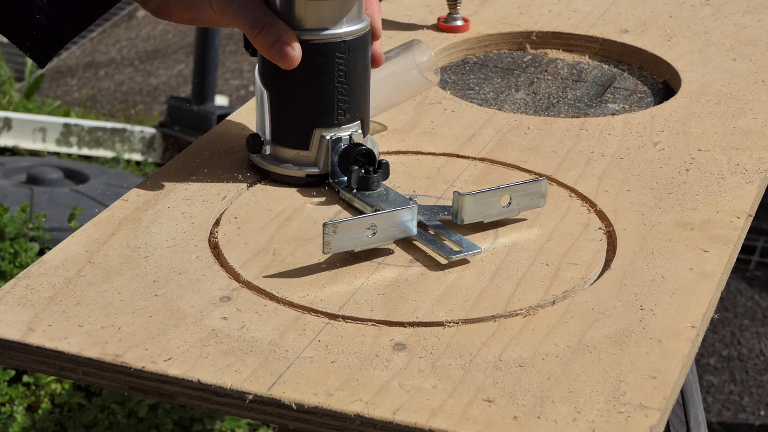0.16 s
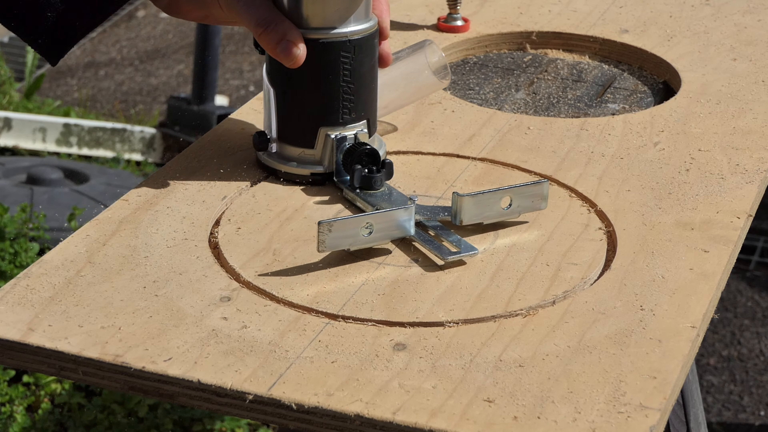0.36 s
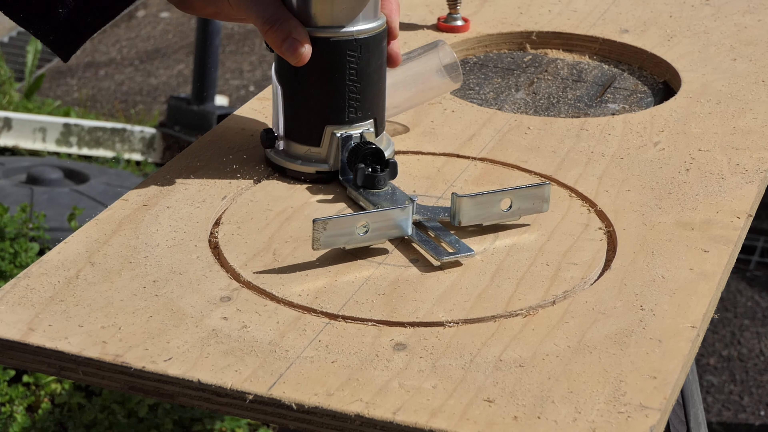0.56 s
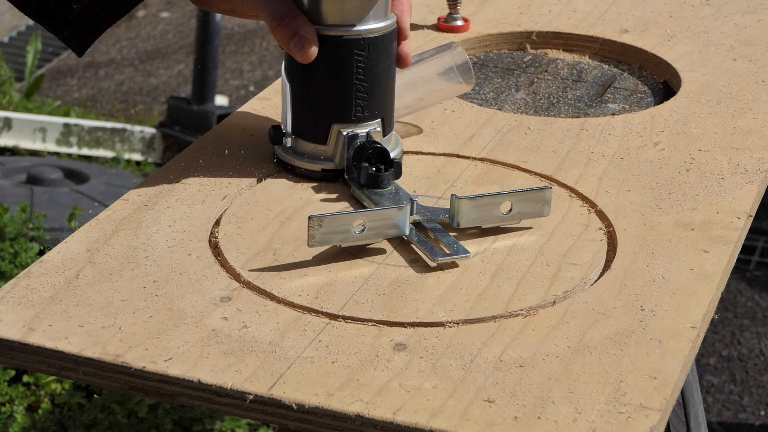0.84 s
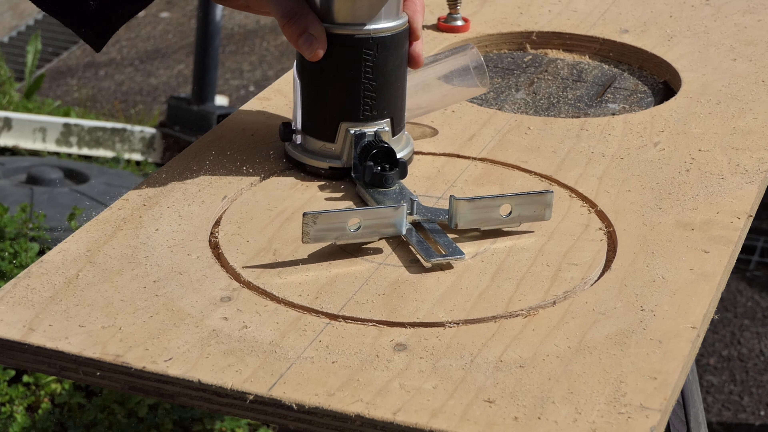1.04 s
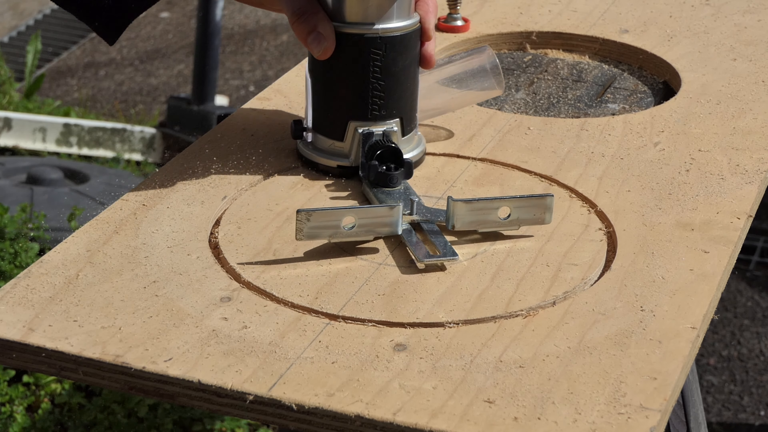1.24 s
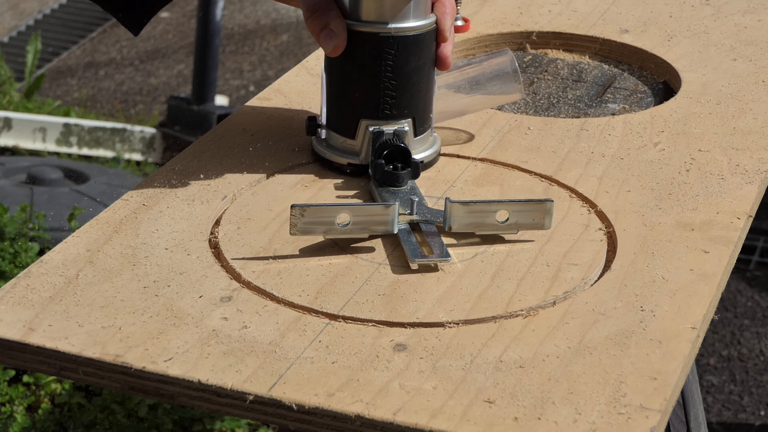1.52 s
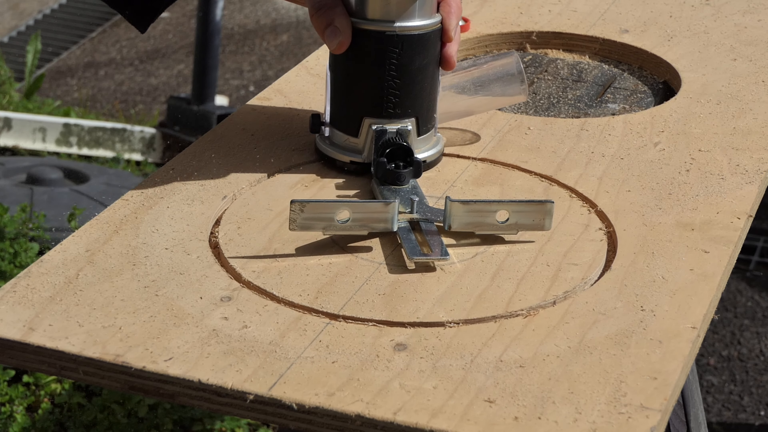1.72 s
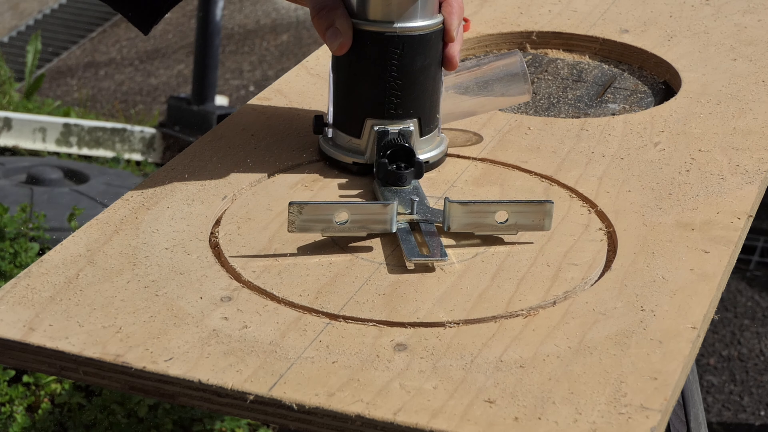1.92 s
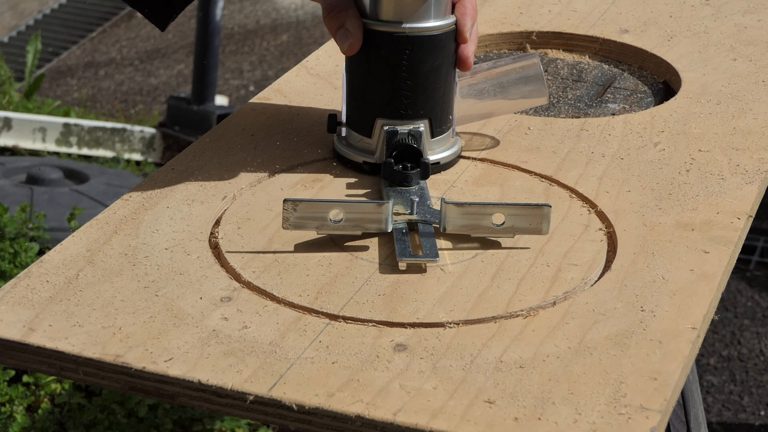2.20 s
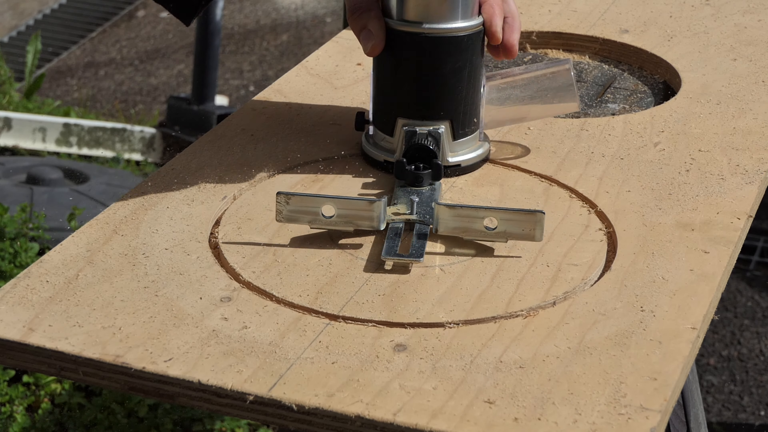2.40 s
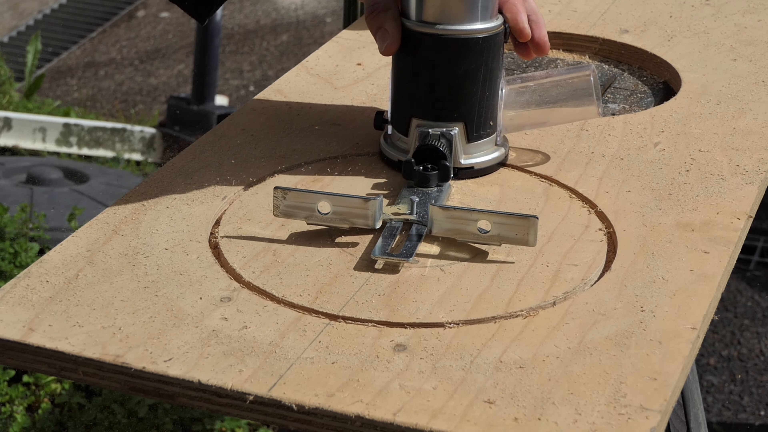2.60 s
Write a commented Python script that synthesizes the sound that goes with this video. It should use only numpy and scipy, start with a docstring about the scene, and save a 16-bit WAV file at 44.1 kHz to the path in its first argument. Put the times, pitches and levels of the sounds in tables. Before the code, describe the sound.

An electric router whines loudly and steadily at high pitch, cutting plywood with airy hiss, close up

```python
"""Electric router in plywood

A hand-held router cuts a circular groove outdoors, heard close up in stereo.
Motor, fan and bit whine: sines on the multiples of the shaft turn, swelling and fading as the tool swings round.
Cooling air and chips: shaped noise, its upper parts louder once a turn; splinters add short noise bursts.
A band of noise rings hollow in the housing; below lie a faint outdoor rumble and a brief distant hum."""
import sys
import numpy as np
from scipy import signal
from scipy.fft import rfft, irfft
from scipy.io import wavfile
from scipy.ndimage import uniform_filter1d

SR = 44100
rng = np.random.default_rng(int(sys.argv[2]) if len(sys.argv) > 2 else 0)


def dump_mix(stems):
    """Bounce the given channels to the path in sys.argv[1] as a 16-bit WAV at rate SR."""
    frames = np.atleast_2d(stems).T  # one column per channel
    limited = np.clip(frames, -1, 1)  # hard clip at full scale
    pcm = np.round(limited * 32767).astype(np.int16)
    wavfile.write(sys.argv[1], SR, pcm)


N = 121716
TIME_S = np.arange(N) / SR


def undb(db):
    """Amplitude factor of a level in dB."""
    return 10 ** (np.asarray(db) / 20)


def unit(x):
    """Scale to rms 1."""
    return x / np.sqrt(np.mean(x ** 2))


def curve(rows, column=1):
    """Table column joined by straight lines in time."""
    rows = np.array(rows)
    return np.interp(TIME_S, rows[:, 0], rows[:, column])


def gate(start_s, end_s, ramp_s):
    """0 to 1 and back in linear ramps centred on start and end."""
    return np.clip(np.minimum(TIME_S - start_s, end_s - TIME_S) / ramp_s + .5, 0, 1)


def walk(rate_hz):
    """Random levels held 1 / rate s and smoothed twice; rms 1."""
    hold = int(SR / rate_hz)
    held = rng.standard_normal(1000)[np.arange(N) // hold]
    return unit(uniform_filter1d(uniform_filter1d(held, hold), hold))


def steps(rate_hz, slew_s):
    """Random levels that hold for uneven spells and change within slew_s."""
    wait, level = rng.exponential(size=99), rng.standard_normal(99)
    held = level[np.searchsorted(np.cumsum(wait) / rate_hz, TIME_S)]
    return uniform_filter1d(held, round(slew_s * SR))


def noise(shape, colour=None):
    """Noise of expected rms 1 with a (frequency [Hz], level [dB]) shape; colour filters it further."""
    log_hz = np.log(np.arange(N // 2 + 1) * SR / N + 1)
    points = np.array(shape)
    gain = undb(np.interp(log_hz, np.log(points[:, 0]), points[:, 1], left=-90))
    spectrum = rfft(rng.standard_normal(N)) * gain / np.sqrt(np.mean(gain ** 2))
    if colour is not None:
        points = np.array(colour)
        spectrum = spectrum * undb(np.interp(log_hz, np.log(points[:, 0]), points[:, 1]))
    return irfft(spectrum, N)


def pan(x, db):
    """Stereo pair, left db above right."""
    return x * undb(np.array([db / 2, -db / 2]).reshape(2, -1))


def sides(x):
    """Stereo pair of opposite sign."""
    return np.array([x, -x])


# shaft speed: (time [s], speed [turns/s])
SHAFT_SPEED = [(0.06, 470.7), (0.35, 470.1), (0.5, 470.7), (0.8, 470.9), (0.95, 471.5), (1.1, 470.3),
               (1.4, 469.4), (1.55, 469.9), (1.7, 471.4), (1.85, 471.6), (2.15, 471.8), (2.3, 470.8),
               (2.42, 470.4), (2.48, 469.6), (2.54, 466.3), (2.6, 465.3), (2.68, 467.0), (2.75, 467.2)]


def shaft_turns():
    """Shaft angle in turns: the running sum of its speed."""
    return np.cumsum(curve(SHAFT_SPEED)) / SR


# tones with closely followed levels: (time [s], level [dB] of each of FOLLOWED_MULTIPLES)
FOLLOWED_LEVELS = [(0.06, -64, -38, -33.5, -27.5, -27, -31), (0.16, -37, -36, -28, -39, -19, -35),
                   (0.23, -43.5, -30.5, -36, -28, -24, -33), (0.43, -40.5, -38.5, -30.5, -28, -24, -31),
                   (0.57, -35, -30, -33.5, -28.5, -25, -31), (0.7, -41, -37, -30, -26.5, -24.5, -31),
                   (0.79, -30, -30, -29.5, -30, -32.5, -39), (0.85, -32.5, -34.5, -31.5, -40, -22.5, -40),
                   (0.94, -29, -32, -27, -38, -24, -35), (1.04, -31, -33, -29, -28, -25.5, -38),
                   (1.15, -33.5, -27.5, -28, -30.5, -24, -39), (1.37, -31, -35, -30.5, -25, -30.5, -37),
                   (1.46, -39.5, -41, -30, -20, -28.5, -36), (1.52, -33, -34.5, -44, -25, -31.5, -39),
                   (1.63, -34.5, -34, -37, -26.5, -37, -50), (1.74, -33.5, -26.5, -41, -36.5, -32.5, -45),
                   (1.93, -35, -31, -38, -26.5, -26, -35), (2.06, -28.5, -30, -34, -26, -36, -43),
                   (2.13, -34.5, -27, -39, -20.5, -29.5, -47), (2.3, -36, -35, -38, -21, -24, -37),
                   (2.37, -37.5, -41, -50, -21, -29, -41), (2.44, -34.5, -36.5, -31, -21.5, -23, -34),
                   (2.62, -45.5, -40, -23, -21.5, -34, -32.5), (2.75, -41, -36, -23, -21, -28.5, -31.5)]
# shaft multiples of those columns: (multiple [-], ...)
FOLLOWED_MULTIPLES = (2, 3, 4, 5, 7, 11)
# changes between the four stretches of the swing: (time [s], ...)
SHIFT_TIMES_S = [0.75, 1.514, 2.51]
# tones with a level per stretch: (multiple [-], level [dB] in each of the four stretches)
STRETCH_TONES = [(1, -39, -41.5, -48.5, -52), (6, -37.5, -32.5, -34.5, -32.5), (8, -34, -30, -29.5, -34.5),
                 (9, -36, -39.5, -44, -42), (10, -38.5, -42, -39, -45), (12, -36, -40.5, -38.5, -36),
                 (13, -42, -40, -46.5, -48), (14, -45.5, -52, -49, -46), (15, -47, -38, -40.5, -42),
                 (16, -49, -49, -48, -54), (17, -50, -50, -44.5, -53), (18, -40.5, -44, -41.5, -48),
                 (19, -35.5, -37.5, -44.5, -42), (20, -47, -47.5, -39, -46)]
# highest tones: (multiple, rounded to play [-], level [dB] in first half of swing, level [dB] in second)
HIGH_TONES = [(21, -50, -47), (22, -43, -49.5), (23, -54.5, -50), (23.9, -45, -54), (25, -53, -50),
              (26, -46.5, -61), (27, -56, -54), (28, -59, -54), (29, -52, -60), (30, -54, -63)]
# jumps and dropouts as the bite changes: (multiple [-], start [s], end [s], change [dB])
BITE_JUMPS = [(6, 0.777, 1.1, -9), (7, 0.76, .81, -4), (20, 0.66, 1.05, 5.5), (12, .82, 0.96, -8),
              (10, .88, .96, 7), (5, .95, 1.02, -9), (7, 1.01, 1.08, -8), (10, 1.28, 1.72, -8),
              (12, 1.38, 1.55, 4.5), (12, 1.56, 1.78, -8.5), (19, 1.35, 1.56, 2), (20, 1.55, 1.77, -8),
              (9, 1.87, 2.01, 12.5), (15, 2.34, 2.4, -17), (22, 2.35, 2.39, 13), (7, 2.19, 2.24, -12),
              (7, 2.38, 2.41, -16), (8, 2.37, 2.41, -6), (9, 2.42, 2.51, 7), (12, 2.44, 2.53, -14)]
SHIFT_TAKES_S, JUMP_TAKES_S = .08, .012
SWELL_DB_PER_MULTIPLE, SWELL_RATE_HZ = .26, 12


def tone_levels():
    """Level in dB of each multiple, set by swing and bite; all but the closely followed also step at random."""
    levels = {k: curve(FOLLOWED_LEVELS, 1 + i) for i, k in enumerate(FOLLOWED_MULTIPLES)}
    shifts = [np.clip((TIME_S - s) / SHIFT_TAKES_S + .5, 0, 1) for s in SHIFT_TIMES_S]
    high = [(k, first, first, second, second) for k, first, second in HIGH_TONES]
    for k, *db in list(STRETCH_TONES) + high:
        swing_db = db[0] + np.diff(db) @ shifts
        # squared steps: small rises, deep dips
        dips = (steps(SWELL_RATE_HZ, 2 * JUMP_TAKES_S) ** 2 - 1) / 2
        levels[round(k)] = swing_db - SWELL_DB_PER_MULTIPLE * k * dips
    for k, start_s, end_s, db in BITE_JUMPS:
        levels[round(k)] += db * gate(start_s, end_s, JUMP_TAKES_S)
    return levels


# stereo of the low tones: (multiple [-], left minus right early [dB], late [dB], side reflection level [dB])
TONE_STEREO = [(1, -1, 1, -78.5), (2, 0, 2.5, -58), (3, -0.5, 0.5, -54), (4, -9.5, -5.5, -44),
               (5, 2, -2.5, -44), (6, -2, -3, -50), (7, 1, 2, -54), (8, 0.6, -0.5, -60)]
FLUTTER_DB, FLUTTER_RATE_HZ, FLUTTER_TILT = -30.5, 220, .8  # dB at multiple 1; tilt is a power of the multiple
PHASE_SPREAD_CYCLES = .24  # random phase of each tone; they line up only loosely into a pulse each turn


def whine(turns):
    """Motor, fan and bit: one sine per shaft multiple, fluttering more the higher it is."""
    late = np.clip((TIME_S - SHIFT_TIMES_S[0]) / (SHIFT_TIMES_S[-1] - SHIFT_TIMES_S[0]), 0, 1)
    stereo, out = np.array(TONE_STEREO), 0
    for k, level_db in tone_levels().items():
        early_pan_db, late_pan_db, side_db = (np.interp(k, stereo[:, 0], stereo[:, c]) for c in (1, 2, 3))
        share = undb(FLUTTER_DB) * k ** FLUTTER_TILT
        flutter = 1 + share * (walk(FLUTTER_RATE_HZ) + 1j * walk(FLUTTER_RATE_HZ))
        phase = k * turns + PHASE_SPREAD_CYCLES * rng.standard_normal()
        tone = np.sqrt(2) * np.real(flutter * np.exp(2j * np.pi * phase))
        out = out + pan(undb(level_db) * tone, (1 - late) * early_pan_db + late * late_pan_db)
        if k <= len(stereo):
            # reflection: a quarter cycle late, opposite left and right, no flutter
            reflection = np.sqrt(2) * np.sin(2 * np.pi * phase)
            out = out + sides(undb(side_db + 1.6 * walk(2.3)) * reflection)
    return out


# air and chip hiss spectrum: (frequency [Hz], density [dB])
HISS_SHAPE = [(300, -26), (440, 1.5), (570, -5), (720, 7.5), (1200, 1), (2100, -4.5), (4500, -7.5),
              (6500, -10), (9000, -7), (12000, -9), (13300, -19), (15000, -18), (15800, -24)]
# hiss that differs left and right: (frequency [Hz], level against the shared hiss [dB])
HISS_SIDE_SHAPE = [(300, -13), (1000, -16), (2200, -16), (3500, -9.5), (5000, -9), (9000, -20.5),
                   (13000, -4.5)]
# hiss gain: (time [s], low part [dB], middle part [dB], high part [dB])
HISS_GAINS = [(.06, -33, -25, -30), (.2, -40, -26, -32), (.8, -38.5, -27.5, -32),
              (1.1, -39.5, -27.5, -32.5), (1.4, -40, -26.5, -32.5), (1.6, -38.5, -30, -35),
              (1.9, -37, -27.5, -31), (2.3, -42, -29.5, -33), (2.75, -43, -29.5, -34)]
# where low, middle and high part meet: (frequency [Hz], ...)
HISS_SPLITS_HZ = 1270, 6250
PULSE_DEPTH, GRAIN_DB, GRAIN_RATE_HZ = .5, 1, 110  # grain: quick flicker of the chips


def hiss(turns):
    """Turbulent air and chips: noise in three parts, the upper two pulsing once a turn."""
    air = noise(HISS_SHAPE) + sides(noise(HISS_SHAPE, HISS_SIDE_SHAPE))
    below = [signal.sosfiltfilt(signal.butter(2, hz, fs=SR, output="sos"), air) for hz in HISS_SPLITS_HZ]
    pulse = 1 + PULSE_DEPTH * np.cos(2 * np.pi * turns)
    parts = below[0], (below[1] - below[0]) * pulse, (air - below[1]) * pulse
    out = 0
    for i, part in enumerate(parts):
        gain_db = curve(HISS_GAINS, 1 + i) + .13 * walk(11) + GRAIN_DB * walk(GRAIN_RATE_HZ)
        out = out + part * undb(gain_db)
    return out


# hollow ring of the housing: (time [s], level [dB])
RING_LEVEL = [(0.06, -29), (0.14, -33), (2.28, -30), (2.75, -39.5)]
RING_HZ, RING_WIDTH_HZ, RING_PAN_DB, RING_SIDE_DB = 1630, 404, -2.5, -34


def ring():
    """Turbulent air excites a broad hollow resonance in the housing, stronger on the right."""
    edges_hz = [RING_HZ - RING_WIDTH_HZ / 2, RING_HZ + RING_WIDTH_HZ / 2]
    band = signal.butter(2, edges_hz, "band", fs=SR, output="sos")
    mid, side = (unit(signal.sosfilt(band, rng.standard_normal(N))) for _ in range(2))
    return undb(curve(RING_LEVEL)) * (pan(mid, RING_PAN_DB) + undb(RING_SIDE_DB) * sides(side))


# outdoor rumble spectrum: (frequency [Hz], density [dB])
RUMBLE_SHAPE = [(25, -23), (70, -14), (90, -4), (130, .5), (200, -3), (400, -4)]
# rumble that differs left and right: (frequency [Hz], level against the shared rumble [dB])
RUMBLE_SIDE_SHAPE = [(30, 0), (70, -9), (300, -12)]
RUMBLE_DB = -57


def rumble():
    """Outdoor rumble: low noise, gently wandering in level."""
    shape = list(RUMBLE_SHAPE) + [(900, -90)]
    stereo = noise(shape) + sides(noise(shape, RUMBLE_SIDE_SHAPE))
    return undb(RUMBLE_DB + 1.6 * walk(3.7)) * stereo


# splinters tearing out: (burst centre [s], level [dB], half-length to 1/e [s])
SPLINTER_BURSTS = [(1.365, -29, .016), (1.445, -32, .012), (2.37, -34, .015)]
# splinter spectrum: (frequency [Hz], density [dB])
SPLINTER_SHAPE = [(900, -40), (2500, -4), (5000, 0), (7000, -9), (15800, -26)]


def splinters():
    """Tearing wood: bell-shaped bursts of bright noise, equal left and right."""
    bursts = sum(undb(db) * np.exp(-((TIME_S - s) / length_s) ** 2) for s, db, length_s in SPLINTER_BURSTS)
    return bursts * noise(SPLINTER_SHAPE)


HUM_HZ, HUM_PEAK_DB, HUM_FROM_S, HUM_TO_S, HUM_RAMP_S = 177, -56, 1.66, 2.3, .032


def hum():
    """Distant hum: one unsteady sine that comes and goes once."""
    on = np.clip(np.minimum(TIME_S - HUM_FROM_S, HUM_TO_S - TIME_S) / HUM_RAMP_S, 0, 1)
    return undb(HUM_PEAK_DB + 2.5 * walk(9)) * on * np.sin(2 * np.pi * HUM_HZ * TIME_S)


def scene():
    """All sources; whine and hiss share one shaft."""
    turns = shaft_turns()
    return whine(turns) + hiss(turns) + ring() + rumble() + splinters() + hum()


START_S, FADE_S, TOP_HZ = .042, .0069, 15750


def record(dry):
    """Silent moment, quick linear fade-in, steep low-pass."""
    fade = np.clip((TIME_S - START_S) / FADE_S, 0, 1)
    low_pass = signal.ellip(16, .2, 90, TOP_HZ, fs=SR, output="sos")
    return signal.sosfilt(low_pass, dry * fade)


dry = scene()
out = record(dry)
dump_mix(out)
```